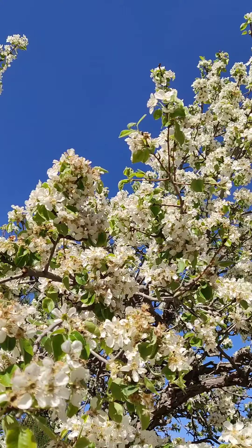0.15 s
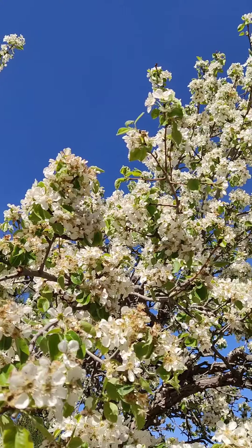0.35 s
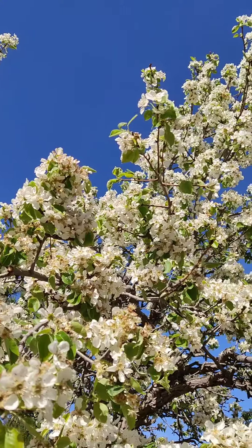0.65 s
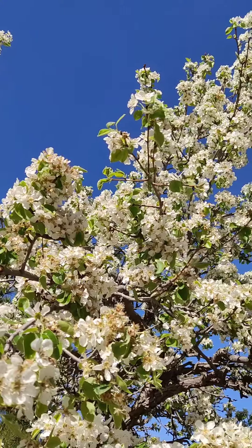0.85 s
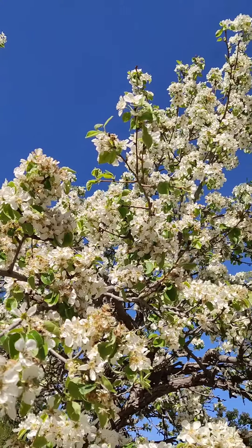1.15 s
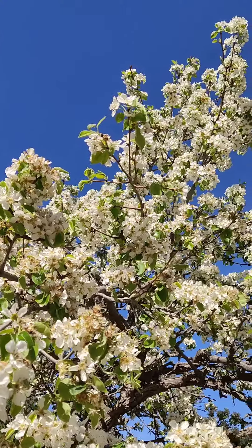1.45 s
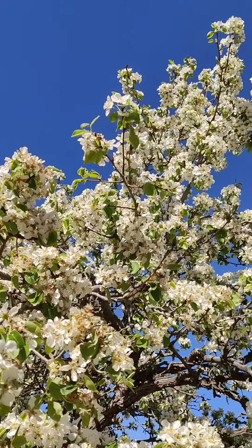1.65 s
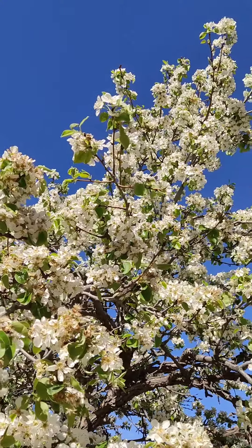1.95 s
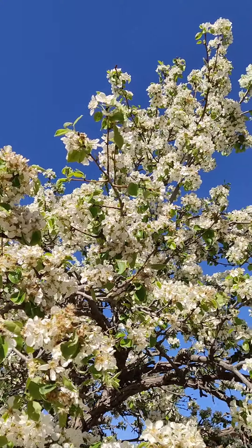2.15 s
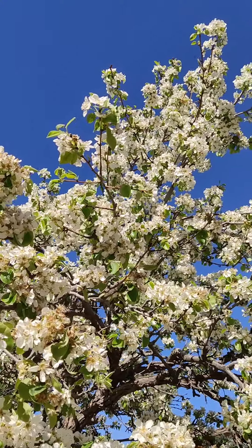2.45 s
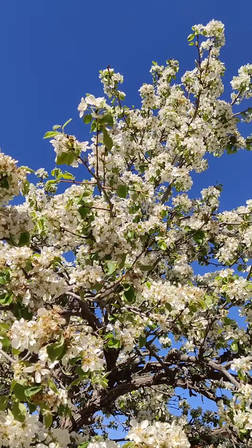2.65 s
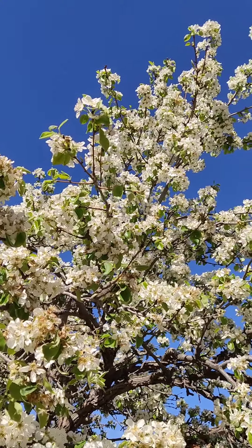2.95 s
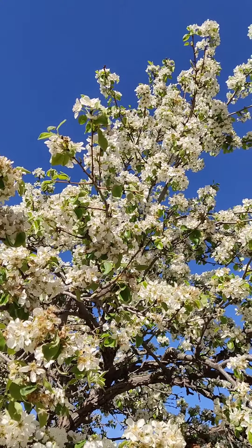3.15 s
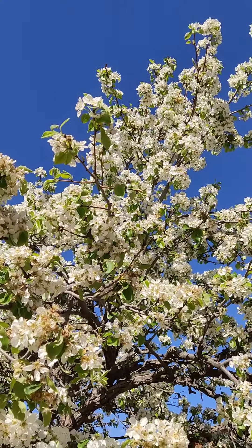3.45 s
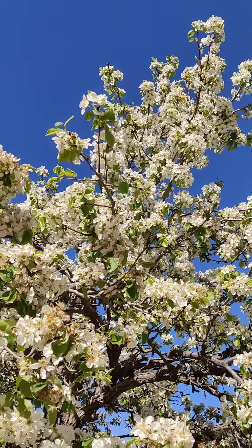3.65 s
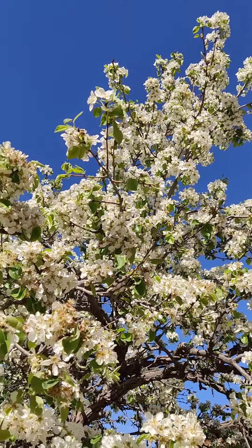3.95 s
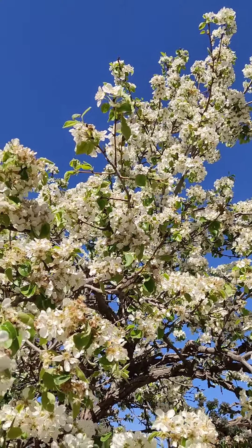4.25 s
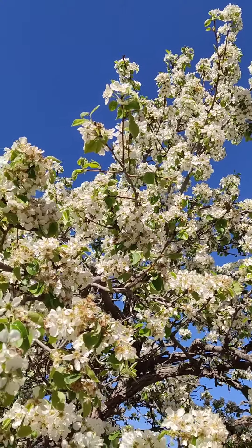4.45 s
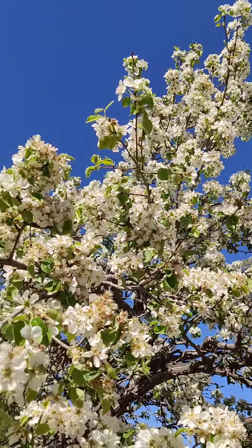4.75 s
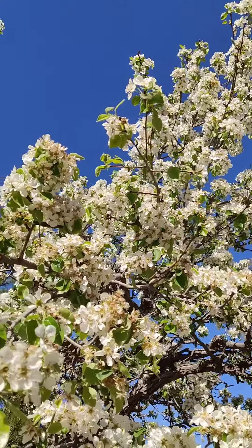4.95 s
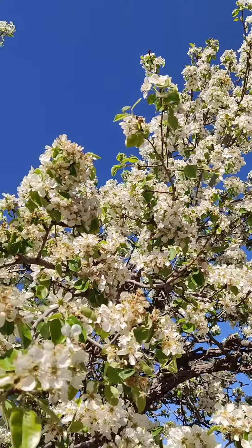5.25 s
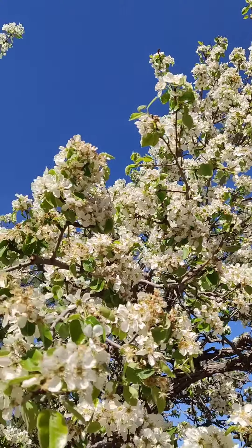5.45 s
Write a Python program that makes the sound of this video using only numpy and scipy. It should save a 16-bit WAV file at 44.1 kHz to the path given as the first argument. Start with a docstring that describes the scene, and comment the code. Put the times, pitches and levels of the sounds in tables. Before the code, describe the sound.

Outdoors under a tree, several small birds warble, whistle and pipe together over a soft hiss of air and distant song. About halfway through, one near bird repeats a thin high note and a sharp falling sweep, then the chorus grows sparser, with one last sweep at the end. Faint leaf rustle and small dry ticks come and go, and low gusts bump the microphone. Almost everything is heard on the left.

```python
"""Small birds sing around a blossoming tree, their notes echoing among the trees, nearly all on the left.
From the start, open air hisses, far song blurs, leaves stir and a breeze rumbles on the microphone.
At once a throaty warbler, whistlers, a piping bird and a peeping bird join in; slurs and dry ticks follow.
Near 2 s the piping gives way to faint falling calls, low slides and then loud, steep downward sweeps.
The gusts are strongest after 3 s; the song thins out after 4 s, and one last sweep comes near the end."""
import sys
import numpy as np
from scipy import signal
from scipy.fft import rfft, irfft, next_fast_len
from scipy.io import wavfile
from scipy.ndimage import uniform_filter1d, minimum_filter1d, map_coordinates

SR = 44100
rng = np.random.default_rng(int(sys.argv[2]) if len(sys.argv) > 2 else 0)


def put_to_file(sound):
    """Save the sound as 16-bit audio at rate SR, in the file named by the first command-line argument."""
    columns = np.atleast_2d(sound).T  # one column per channel
    safe = np.clip(columns, -1, 1)
    whole_steps = np.round(safe * 32767)
    wavfile.write(sys.argv[1], SR, whole_steps.astype(np.int16))


N = 246078   # samples: about 5.6 s


def from_db(db):
    """Turn decibels into a number to multiply a sound by."""
    return 10 ** (np.asarray(db) / 20)


def rms_one(x):
    """Scale a sound so that its average power is 1."""
    return x / np.sqrt(np.mean(x ** 2) + 1e-20)


def in_time(rows):
    """Join a table's points with straight lines: one curve for each column after the time."""
    s, *columns = np.transpose(rows)
    return [np.interp(np.arange(N) / SR, s, c) for c in columns]


def add(out, s, sound):
    """Mix a sound in at s seconds."""
    i = int(np.clip(round(s * SR), 0, N))
    out[i:i + len(sound)] += sound[:N - i]


def delayed(x, s):
    """The same sound s seconds later."""
    return np.interp(np.arange(N) - s * SR, np.arange(N), x, left=0)


def drift(rate, size=N):
    """A smooth random wobble, about 1 in size, that turns about rate times a second."""
    knots = rng.standard_normal(size // 50 + 4)
    return map_coordinates(knots, [np.arange(size) * min(rate / SR, 1 / 50)], order=2, mode="mirror")


def noise(spectrum):
    """Noise of power 1; the table says how strong each frequency is."""
    hz, db = np.transpose(spectrum)
    size = next_fast_len(N)
    f = np.maximum(np.fft.rfftfreq(size, 1 / SR), 1)
    octaves_outside = np.abs(np.log2(f / np.clip(f, hz[0], hz[-1])))
    gain = from_db(np.interp(np.log(f), np.log(hz), db) - 20 * octaves_outside)
    return rms_one(irfft(rfft(rng.standard_normal(size)) * gain, size)[:N])


def swells(rows):
    """The strength over time of short events that each grow and fade smoothly."""
    t = np.arange(N) / SR
    return sum(from_db(db) * np.cos(np.pi * np.clip((t - s) / length, -.5, .5)) ** 2
               for s, length, db in rows)


def bird_voice(hz, level, waver, flutter_db):
    """A bird's voice box makes a nearly pure tone; its pitch wavers and its strength flutters."""
    size = len(hz)
    phase = 2 * np.pi * np.cumsum(hz * (1 + waver * drift(253, size))) / SR
    to_edge_s = np.minimum(np.arange(size), np.arange(size)[::-1]) / SR
    flutter = from_db(flutter_db * drift(121.6, size))
    return np.sin(phase) * level * flutter * np.minimum(to_edge_s / .00086, 1)


def song(shape, repeats, waver, flutter_db):
    """One bird repeats its note, a little higher or lower each time."""
    s, hz, db = np.transpose(shape)
    t = np.arange(int(s[-1] * SR)) / SR
    note_hz, note_db = np.interp(t, s, hz), np.interp(t, s, db)
    out = np.zeros(N)
    for start, level_db, ratio in repeats:
        add(out, start, bird_voice(ratio * note_hz, from_db(level_db + note_db), waver, flutter_db))
    return out


def whistles(rows, waver, flutter_db, fade=.27):
    """Each whistle bends through three pitches; fade is the share of it spent fading in and out."""
    out = np.zeros(N)
    for start, length, first, middle, last, level_db in rows:
        progress = np.linspace(0, 1, int(max(length, .01) * SR))
        hz = np.polyval(np.polyfit([0, .5, 1], [first, middle, last], 2), progress)
        level = from_db(level_db) * signal.windows.tukey(len(progress), fade)
        add(out, start, bird_voice(hz, level, waver, flutter_db))
    return out


def among_trees(x, tail_db, tail_s, echoes=()):
    """A sound, its clear echoes and a tail scattered by branches, which dies by 60 dB in tail_s."""
    t = np.arange(SR) / SR
    twigs = rng.standard_normal(SR) * from_db(4.4 * drift(301.5, SR))   # reflections come in clumps
    scatter = twigs * from_db(-60 * t / tail_s) * np.minimum(t / .0074, 1)
    tail = signal.fftconvolve(x, scatter / np.linalg.norm(scatter))[:N]
    return x + from_db(tail_db) * tail + sum(from_db(db) * delayed(x, s) for s, db in echoes)


def far_chirps(low_hz, high_hz, count, glide=.08):
    """Distant birds throw in short glides at random, mostly falling and blurred by echoes."""
    rows = []
    for when, span, pitch, slope, distance in rng.random((count, 5)):
        hz = low_hz * (high_hz / low_hz) ** pitch
        bend = glide * np.sign(slope - .3) * (.5 + span)
        arc_hz = hz * (1 + bend), hz, hz * (1 - bend / 2)
        rows.append((when * N / SR, .0322 + .0471 * span, *arc_hz, -6 * distance))
    return rms_one(among_trees(whistles(rows, waver=.01, flutter_db=2.5), tail_db=4, tail_s=.5))


# the tone of open air, far song and high twitter: (frequency [Hz], level [dB])
AIR_TONE = [(100, -42), (230, -10), (400, -3), (720, 4.5), (1000, 1), (1600, 0.5), (2500, -6), (4500, -16),
            (7000, -60)]
FAR_SONG_TONE = [(1500, -21), (1900, 1.5), (2200, 4), (2700, 2.5), (3400, -6.5), (3850, 0.5), (4500, -11.5),
                 (5200, -18.5), (7000, -27.5)]
TWITTER_TONE = [(3500, -3), (5000, -13.5), (6900, -6), (7400, -13), (8200, -23.5)]
# how loud each one is: (time [s], air [dB], far song [dB], twitter [dB])
BACKGROUND_LEVELS = [(0, -32.5, -22, -50), (.15, -37.5, -34, -55.5), (.35, -28, -29.5, -40.5),
                     (.62, -31, -29, -43), (.8, -32.5, -34, -47.5), (1.6, -30, -31.5, -48),
                     (2.2, -32.5, -35.5, -45.5), (2.88, -31, -26.5, -43), (3.28, -33, -31.5, -46),
                     (3.8, -30.5, -30, -44), (4.3, -32.5, -34.5, -57), (5.0, -31.5, -32.5, -50.5),
                     (5.58, -33.5, -28, -53)]

def background():
    """Open air hisses; far song and high twitter are each a blur with chirps standing out of it."""
    air_db, song_db, twitter_db = in_time(BACKGROUND_LEVELS)
    air = from_db(air_db + 1.15 * drift(25)) * noise(AIR_TONE)
    low_chirps, high_chirps = far_chirps(1900, 4000, count=130), far_chirps(4500, 6600, count=110)
    far_song = from_db(-2) * noise(FAR_SONG_TONE) + from_db(-.5) * low_chirps
    twitter = from_db(.5) * noise(TWITTER_TONE) + from_db(2) * high_chirps
    return air + from_db(song_db) * far_song + from_db(twitter_db + 1.8 * drift(40)) * twitter


# the tone of the wind's deep rumble and of the flutter above it: (frequency [Hz], level [dB])
RUMBLE_TONE = [(12, 4.5), (30, 4), (50, -4), (85, -6.5), (130, -18.5), (200, -46), (400, -38), (900, -57)]
FLUTTER_TONE = [(70, -3.5), (120, -4.5), (170, -2.5), (250, -21), (500, -22)]
# how hard the breeze blows on the microphone: (time [s], left [dB], right [dB])
BREEZE_LEVELS = [(0, -48, -52.5), (.8, -45, -50.5), (1.75, -50, -51), (2.0, -40, -49), (2.6, -44.5, -43),
                 (2.95, -34, -44), (3.17, -53.5, -49), (3.45, -26, -41), (3.68, -41, -41), (3.95, -32, -31),
                 (4.35, -30, -47), (4.58, -42, -47), (4.85, -26.5, -46), (5.33, -34.5, -39),
                 (5.48, -41, -45), (5.58, -50, -38)]
# single swirls of air that bump the left side: (peak time [s], length [s], level [dB])
WIND_BUMPS = [(.89, 0.075, -32.5), (2.0, .1, -34), (2.295, 0.098, -21), (2.61, 0.13, -30),
              (2.78, 0.083, -20.5), (3.43, 0.13, -26), (3.51, 0.095, -22.5), (5.04, 0.079, -20)]

def breeze():
    """Swirls of air hit each side of the microphone separately; small, quick ones add a flutter."""
    left_db, right_db = in_time(BREEZE_LEVELS)
    sides = []
    for strength in np.hypot(from_db(left_db), swells(WIND_BUMPS)), from_db(right_db):
        wind = noise(RUMBLE_TONE) + from_db(-17.5 + 6.3 * drift(30)) * noise(FLUTTER_TONE)
        steady = wind / np.sqrt(uniform_filter1d(wind ** 2, size=3000) + .05)   # even it out first
        lumps = from_db(2.5 * drift(35))
        sides.append(strength * steady * lumps)
    return np.array(sides)


# the tone of the leaves: (frequency [Hz], level [dB])
LEAF_TONE = [(1000, 5), (3000, 10.5), (6000, 0), (7000, -0.5), (7700, -10), (8400, -9.5), (9500, 6),
             (10500, -25), (12000, -13), (14000, -22)]
# moments when they brush together: (peak time [s], length [s], level [dB])
LEAF_BRUSHES = [(.48, 0.78, -35.5), (1.41, 0.058, -29), (1.59, 0.14, -28), (1.685, 0.07, -28),
                (2.335, 0.065, -37), (2.92, .05, -36), (4.97, 0.047, -37)]

def leaves(rest_db=-41.5, grain_db=2):
    """Leaves brush in crisp, grainy swells and never quite settle in between."""
    strength = np.hypot(from_db(rest_db), swells(LEAF_BRUSHES))
    return strength * rms_one(noise(LEAF_TONE) * from_db(grain_db * drift(350)))


# the tone of a thin, high hiss and of a soft rush on the right: (frequency [Hz], level [dB])
HISS_TONE = [(8500, -14), (10000, 1), (11000, -3.5), (12800, -4.5), (13700, 2), (15000, -3.5), (15400, -20)]
RUSH_TONE = [(40, -8), (200, -4.5), (500, 1), (1000, -10.5), (3000, -8.5), (8000, -43), (15000, -23.5)]

def steady_hiss():
    """Each side has its own faint, high hiss; the right also has a soft, lower rush."""
    left = from_db(-50.5) * noise(HISS_TONE)
    right = from_db(-77) * noise(HISS_TONE) + from_db(-53.5) * noise(RUSH_TONE)
    return np.array([left, right])


# throaty notes: (time [s], length [s], start pitch [Hz], middle pitch [Hz], end pitch [Hz], level [dB])
WARBLE_NOTES = [(0.01, 0.086, 1928, 2250, 2264, -10), (0.08, 0.13, 2290, 2106, 1976, -14.5),
                (0.232, 0.076, 2349, 2062, 1840, -10.5), (0.295, 0.067, 1887, 1940, 2047, -14),
                (0.963, 0.0445, 2258, 2356, 2240, -15.5), (1.01, 0.14, 2360, 2297, 2120, -29),
                (1.25, 0.037, 2390, 2240, 2250, -24)]
# their echoes from trunks and walls: (delay [s], level [dB])
WARBLE_BOUNCES = [(.026, -3.5), (.049, -16.5)]

def warbling_bird():
    """A low, throaty bird; its glides overlap their own strong echoes, which makes them throb."""
    notes = whistles(WARBLE_NOTES, waver=.012, flutter_db=1.5, fade=.55)
    return among_trees(notes, tail_db=-3.5, tail_s=.53, echoes=WARBLE_BOUNCES)


# lone whistles: (time [s], length [s], start pitch [Hz], middle pitch [Hz], end pitch [Hz], level [dB])
WHISTLE_NOTES = [(0.04, 0.071, 4160, 4220, 4270, -30), (0.258, 0.047, 3150, 2900, 2580, -19.5),
                 (0.429, 0.093, 2260, 2263, 2256, -23.5), (0.503, 0.11, 7160, 6640, 7320, -25.5),
                 (0.572, 0.05, 3280, 2810, 2670, -20), (0.662, 0.099, 3240, 4230, 3700, -21),
                 (0.68, 0.12, 1697, 1656, 1590, -32), (0.83, 0.19, 2200, 2123, 2190, -29.5),
                 (1.162, 0.042, 2880, 2850, 2530, -18.5), (1.332, 0.035, 2925, 2890, 2550, -20.5),
                 (1.458, 0.098, 2656, 2710, 2910, -16), (1.556, 0.075, 2940, 2906, 3110, -20.5),
                 (2.035, 0.068, 2016, 1870, 1830, -28.5), (2.179, 0.074, 2335, 2256, 2150, -28.5),
                 (2.327, 0.069, 1866, 1960, 1970, -25), (2.598, 0.08, 2205, 2520, 2500, -28),
                 (2.69, 0.23, 2448, 2140, 2125, -28), (3.425, 0.076, 1905, 2044, 1805, -25.5),
                 (3.681, 0.0945, 1960, 2240, 2183, -24), (4.264, 0.16, 2386, 2258, 2110, -28),
                 (4.38, 0.083, 3860, 3850, 3840, -33.5), (4.469, 0.064, 2186, 2330, 2385, -28.5),
                 (4.93, 0.17, 5130, 5260, 5290, -40), (5.022, 0.14, 1690, 1675, 1570, -31),
                 (5.173, 0.09, 2360, 2390, 2340, -29)]

def whistling_birds(far_count=14, far_hz=2213, far_s=.12, far_db=-36):
    """Birds further off whistle single notes; distant ones take turns with low, randomly bent notes."""
    far_notes = []
    for turn, (late, stretch, pitch, *bends) in enumerate(rng.uniform(-1, 1, (far_count, 6))):
        start = (turn + .5 + late / 2) / far_count * N / SR
        arc_hz = far_hz * (1 + .07 * pitch + .0292 * np.array(bends))
        far_notes.append((start, far_s * (1 + stretch / 2), *arc_hz, far_db))
    notes = whistles(WHISTLE_NOTES + far_notes, waver=.005, flutter_db=2)
    return among_trees(notes, tail_db=-6, tail_s=.5)


# one piping note: (time into the note [s], pitch [Hz], level [dB])
PIPE_NOTE = [(0, 5100, -15), (.003, 3950, -5), (.008, 3670, -1), (.03, 3780, 1), (.058, 3780, -.5),
             (.074, 3700, -2), (.086, 3620, -5)]
# each time it is sung: (time [s], level [dB], pitch [ratio])
PIPE_REPEATS = [(0.084, -12, 1.012), (0.404, -11.5, 0.98), (0.73, -10, 0.98), (1.065, -10, 1.006),
                (1.429, -13.5, 0.99), (1.765, -11.5, 0.99), (2.122, -11, 0.99)]
# its echo from trunks and walls: (delay [s], level [dB])
PIPE_BOUNCES = [(.058, -12)]

def piping_bird():
    """A near bird pipes three times a second; each note drops quickly onto a held pitch."""
    notes = song(PIPE_NOTE, PIPE_REPEATS, waver=.005, flutter_db=.8)
    return among_trees(notes, tail_db=-9.5, tail_s=.8, echoes=PIPE_BOUNCES)


# peeps: (time [s], length [s], pitch [Hz], level [dB])
PEEP_NOTES = [(.12, 0.084, 3180, -20.5), (.437, 0.086, 3160, -17), (.757, .087, 3170, -17),
              (2.28, 0.077, 3200, -29.5), (2.555, 0.056, 3190, -29.5), (2.83, 0.063, 3090, -26),
              (3.093, 0.049, 3160, -27), (3.37, 0.047, 3195, -28), (3.9, 0.04, 3160, -30),
              (4.17, 0.058, 3115, -27.5), (4.795, 0.081, 3195, -25.5), (5.102, 0.095, 3150, -24),
              (5.42, 0.12, 3130, -24.5)]

def peeping_bird():
    """A bird further off peeps on almost one pitch, a touch lower at both ends of each note."""
    rows = [(s, length, .98 * hz, hz, .968 * hz, db) for s, length, hz, db in PEEP_NOTES]
    return among_trees(whistles(rows, waver=.004, flutter_db=1.2), tail_db=-10, tail_s=.45)


# sinking slurs and rising slurs: (time [s], level [dB])
SINKING_SLURS = [(0.362, -36), (1.905, -28), (2.329, -26), (2.755, -29.5)]
RISING_SLURS = [(1.772, -25.5), (2.042, -23.5), (2.167, -24.5), (2.472, -25.5), (2.555, -34), (3.355, -29),
                (4.978, -31.5), (5.228, -31.5), (5.383, -28)]

def slurring_birds(sink_s=.079, sink_hz=(4420, 3920, 3690), rise_s=.068, rise_hz=(3180, 4250, 5100)):
    """Birds further off sing slurs: short notes that glide smoothly down or up."""
    sinks = [(s, sink_s, *sink_hz, db) for s, db in SINKING_SLURS]
    rises = [(s, rise_s, *rise_hz, db) for s, db in RISING_SLURS]
    return among_trees(whistles(sinks + rises, waver=.006, flutter_db=2.5), tail_db=-8, tail_s=.4)


# dry ticks close by: (time [s], level [dB], pitch [Hz], rebound compared with the tick [dB])
TICK_HITS = [(0.461, -15, 940, -17), (0.504, -15.5, 1560, -9), (1.405, -9, 1663, -19),
             (1.574, -15.5, 690, -3), (1.615, -13, 820, -17), (1.678, -15.5, 1080, 3.5),
             (1.763, -18.5, 760, -20), (2.788, -13, 970, -9), (2.910, -6, 1210, -11.5),
             (3.855, -12.5, 1040, -5), (3.883, -12.5, 1080, -12), (4.525, -8, 1400, -3),
             (4.603, -15, 1290, -17), (4.707, -12, 1000, -14), (4.772, -18, 1170, -16),
             (4.885, -5.5, 1076, 1.5)]

def dry_ticks(rebound_s=.0095, rebound_pitch=.794, crack_s=.011, crack_db=-14):
    """Each tick and its lower rebound is a few quickly sinking vibrations with a faint, dull crack."""
    out, t = np.zeros(N), np.arange(SR // 40) / SR
    dull = signal.butter(2, 3500, fs=SR, output="sos")
    for start, db, pitch_hz, rebound_db in TICK_HITS:
        rebound = start + rebound_s, db + rebound_db, pitch_hz * rebound_pitch
        for s, peak_db, hz in (start, db, pitch_hz), rebound:
            age = t * hz   # time counted in vibrations
            sinking_hz = hz * (.75 + 1.1 * np.exp(-age))
            body = age * np.exp(1 - age) * np.sin(2 * np.pi * np.cumsum(sinking_hz) / SR)
            crack = signal.sosfilt(dull, rng.standard_normal(len(t))) * np.exp(-t / crack_s)
            add(out, s, from_db(peak_db) * (body + from_db(crack_db) * crack))
    return among_trees(out, tail_db=-8.5, tail_s=.12)


# one falling call: (time into the note [s], pitch [Hz], level [dB])
FALL_NOTE = [(0, 7500, -2), (0.02, 6500, 3), (0.04, 5700, 4), (0.058, 5400, 8.5), (0.075, 4500, 14.5),
             (0.092, 3650, 10.5)]
# each time it is sung: (time [s], level [dB], pitch [ratio])
FALL_REPEATS = [(1.946, -39, 0.96), (2.343, -40.5, 0.95), (2.689, -45.5, 1.07), (3.571, -40, 0.89),
                (3.99, -49, 0.94), (5.146, -42, 0.99), (5.53, -35, 0.98)]

def falling_calls():
    """A bird's faint call starts very high and grows as it falls by about an octave."""
    notes = song(FALL_NOTE, FALL_REPEATS, waver=.006, flutter_db=2.4)
    return among_trees(notes, tail_db=-3, tail_s=.4)


# one low slide: (time into the note [s], pitch [Hz], level [dB])
SLIDE_NOTE = [(0, 3140, -12), (0.018, 2920, 1), (0.036, 2720, 0.5), (0.07, 2620, -1.5), (0.105, 2565, -1)]
# each time it is sung: (time [s], level [dB], pitch [ratio])
SLIDE_REPEATS = [(2.134, -32.5, 1.03), (2.384, -25.5, 1.01), (2.665, -23, 0.99), (2.927, -22.5, 1.02),
                 (3.196, -20, 1), (3.466, -18.5, 0.99), (3.735, -20, 0.99), (4.005, -21, 0.99),
                 (4.932, -28.5, 0.98), (5.244, -29, 0.92)]

def sliding_bird():
    """A near bird repeats a lower note that slides gently down."""
    notes = song(SLIDE_NOTE, SLIDE_REPEATS, waver=.0024, flutter_db=1)
    return among_trees(notes, tail_db=-7, tail_s=.5)


# one thin "tsip" and one steep sweep: (time into the note [s], pitch [Hz], level [dB])
TSIP_NOTE = [(0, 7150, -8), (.008, 5800, 0), (.015, 5150, -6), (.025, 5120, -7), (.032, 5700, -13)]
SWEEP_NOTE = [(0, 6904, -14), (.005, 5815, -11), (.010, 5050, -13.5), (.034, 4703, -7.5), (.046, 4380, -2),
              (.06, 3980, -4), (.076, 3622, -2.5), (.091, 3380, -12)]
# each time they are sung: (time [s], level [dB], pitch [ratio])
TSIP_REPEATS = [(2.477, -26.5, 1.06), (2.77, -18.5, 1.03), (3.053, -19, 0.99), (3.347, -18.5, 1),
                (3.648, -18, 1.01), (4.863, -32, 1.03), (5.314, -24, 1.03)]
SWEEP_REPEATS = [(2.583, -13.5, 1.036), (2.877, -11, 1.01), (3.163, -10, 0.97), (3.461, -9, 1),
                 (3.757, -10, 1), (5.436, -12.5, 1)]
# their echo from trunks and walls: (delay [s], level [dB])
SWEEP_BOUNCES = [(.0285, -2.5)]

def sweeping_bird(flick_lead_s=.02, flick_s=.0143, flick_hz=(6220, 6940, 7100)):
    """A near bird repeats a thin tsip, an upward flick and a loud downward sweep; leaves smear them."""
    flick_rows = [(s - flick_lead_s, flick_s, *flick_hz, db - 20.5) for s, db, _ in SWEEP_REPEATS]
    tsips = song(TSIP_NOTE, TSIP_REPEATS, waver=.016, flutter_db=3)
    flicks = whistles(flick_rows, waver=.006, flutter_db=2.2)
    sweeps = song(SWEEP_NOTE, SWEEP_REPEATS, waver=.003, flutter_db=3)
    smeared = among_trees(tsips + flicks + sweeps, tail_db=-11, tail_s=.13)
    return among_trees(smeared, tail_db=-9, tail_s=.53, echoes=SWEEP_BOUNCES)


def scene():
    """The right side hears the left's sounds later and much weaker; each has its own wind and hiss."""
    left = background() + leaves() + warbling_bird() + whistling_birds() + piping_bird() + peeping_bird()
    left += slurring_birds() + dry_ticks() + falling_calls() + sliding_bird() + sweeping_bird()
    right = from_db(-27) * delayed(left, .0005)
    return np.array([left, right]) + breeze() + steady_hiss()


def record(dry):
    """A limiter eases the loudest peaks; the microphone has a narrow treble dip; the very top is cut."""
    ceiling, dip_hz, dip_width_hz, top_hz = .8, 12280, 790, 15720
    allowed_gain = np.minimum(1, ceiling / (np.abs(dry).max(axis=0) + 1e-9))
    gain = uniform_filter1d(minimum_filter1d(allowed_gain, size=401), size=401)
    dipped = signal.lfilter(*signal.iirnotch(dip_hz, dip_hz / dip_width_hz, fs=SR), dry * gain)
    return signal.sosfilt(signal.ellip(12, .1, 90, top_hz, fs=SR, output="sos"), dipped)


dry = scene()
out = record(dry)
put_to_file(out)
```